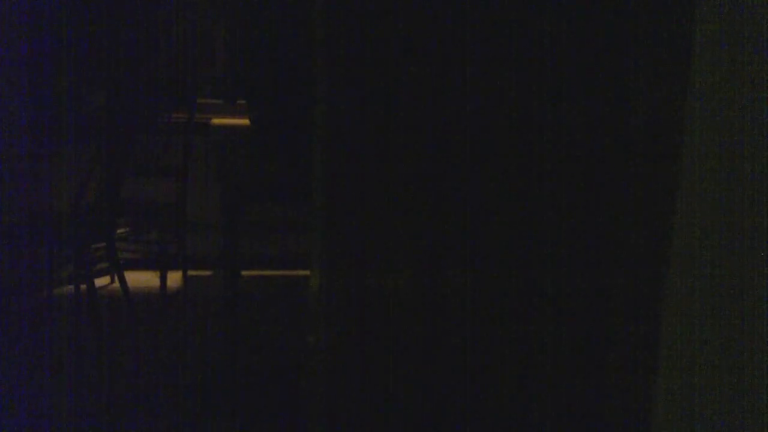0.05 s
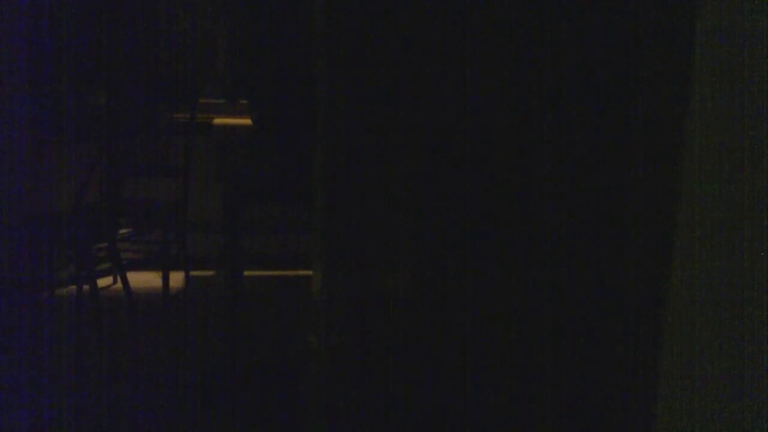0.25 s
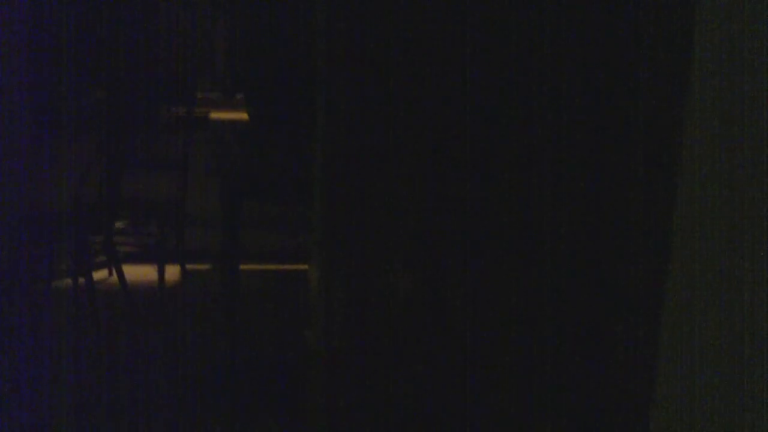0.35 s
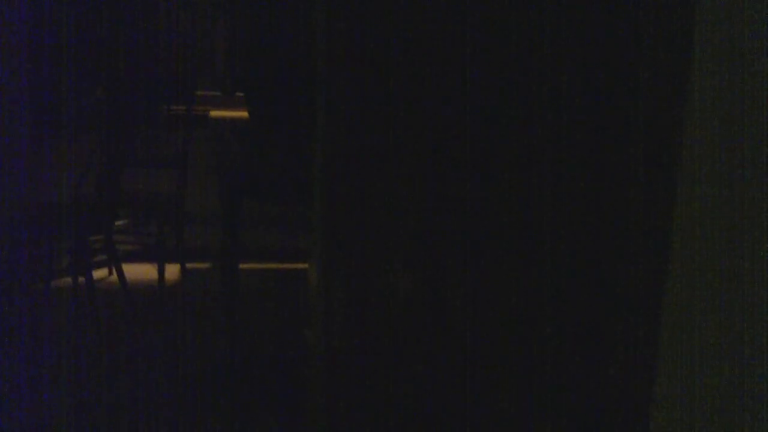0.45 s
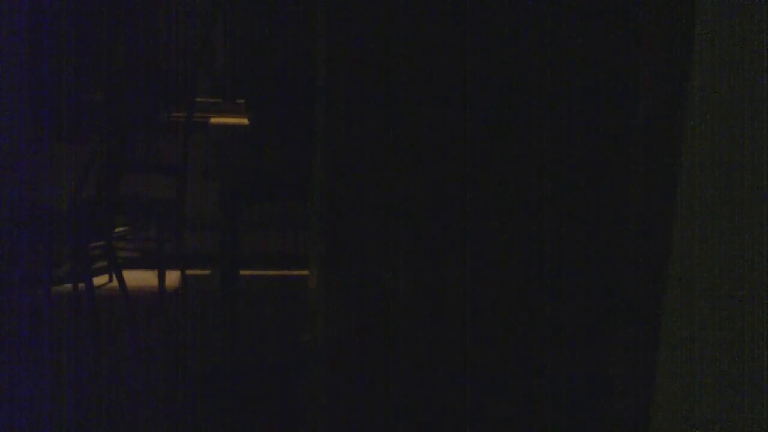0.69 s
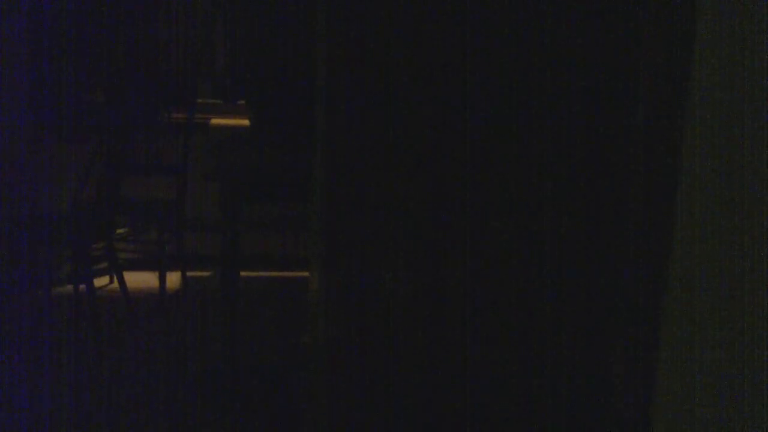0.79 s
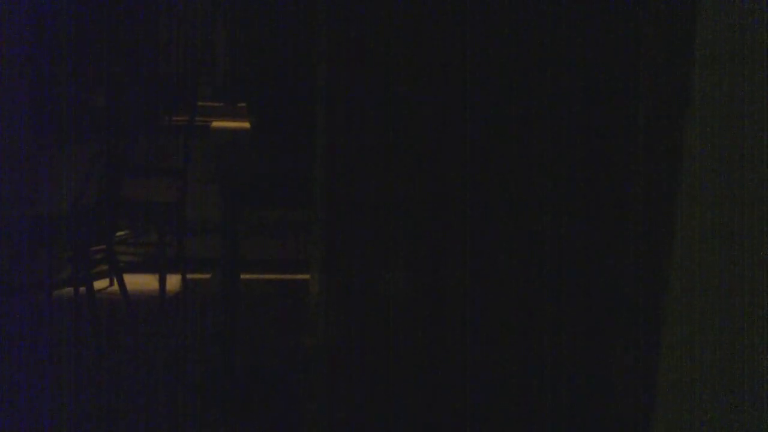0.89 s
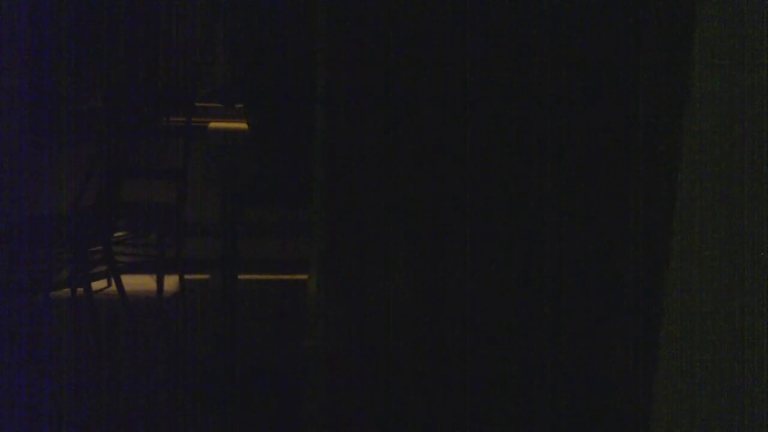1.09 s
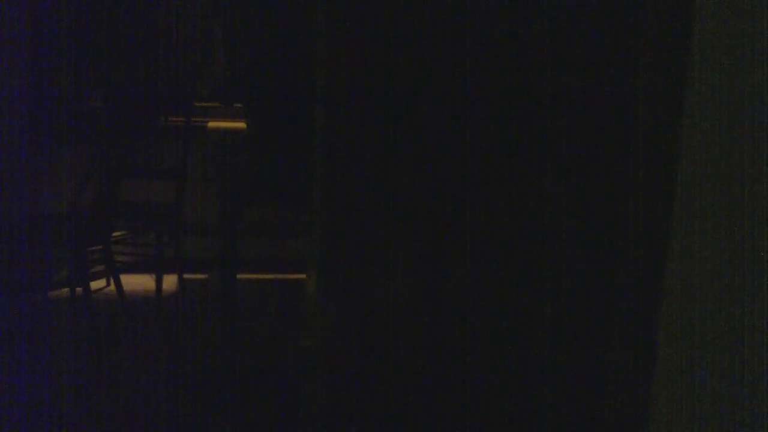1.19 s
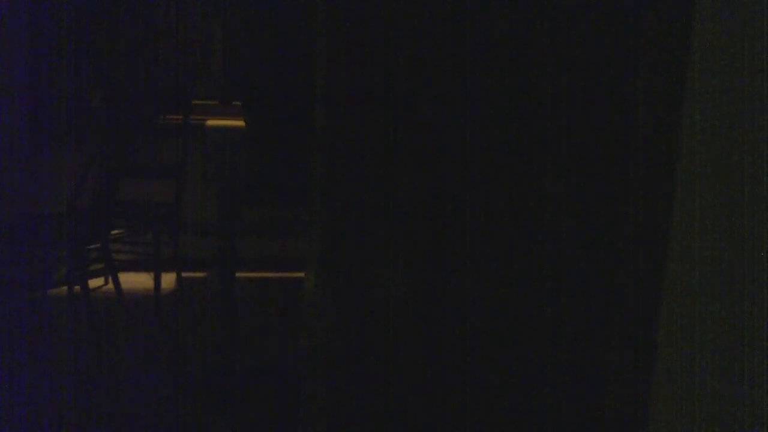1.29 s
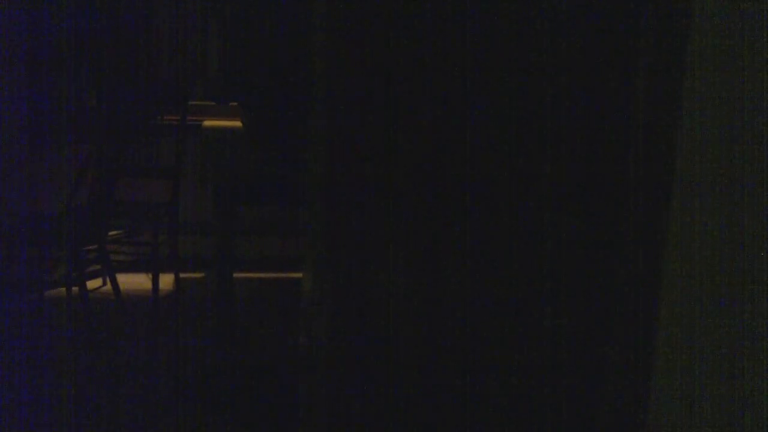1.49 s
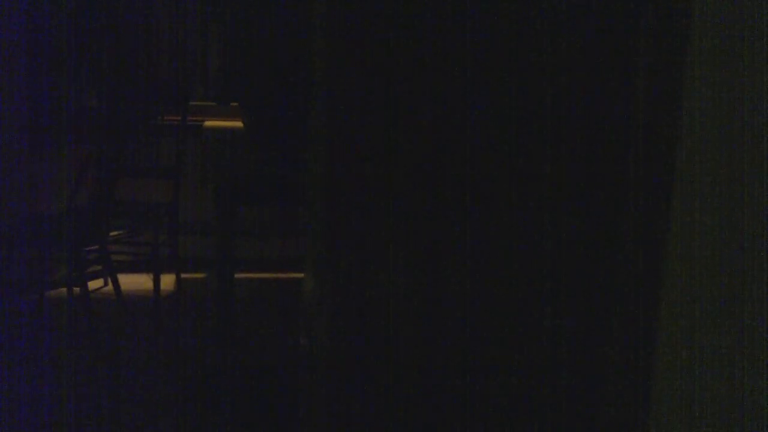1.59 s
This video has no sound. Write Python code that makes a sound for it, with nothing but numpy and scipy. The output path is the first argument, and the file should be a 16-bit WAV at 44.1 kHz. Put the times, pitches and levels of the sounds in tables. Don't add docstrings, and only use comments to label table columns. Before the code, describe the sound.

Three protesting puppy yelps crack from rough bark to shrill whine, ringing in a hard small room

```python
import sys
import numpy as np
from scipy import signal
from scipy.fft import rfft, irfft
from scipy.io import wavfile
from scipy.ndimage import uniform_filter1d

SR = 44100
rng = np.random.default_rng(int(sys.argv[2]) if len(sys.argv) > 2 else 0)


def unload_wav(signal):
    wavfile.write(
        sys.argv[1],
        SR,
        np.round(np.clip(np.atleast_2d(signal).T, -1, 1) * 32767).astype(np.int16),
    )


def boost(x):
    u = np.asarray(x, float) / 20
    return 10 ** u


N = 72765
LEAD_SAMPLES = 11025

# time_s, pitch_hz, level_db, roughness_0_1, half_pitch_share_0_1
EARLIER_YELP = [
    [(-.2, 725, -9, .4, 1), (-.05, 738.5, -38.5, 0.33, 0.23), (.02, 732, -33.5, 0.1, 1)],
    [(-.2, 1810, -16, .2, 0), (-.08, 1816, -36, 0.2674, 0), (-.03, 1890, -59, 0.13, 0.013)],
]


def evened(x):
    return x / np.sqrt(np.mean(x ** 2) + 1e-20)


def read(points, hz):
    table_hz, value = np.transpose(points)
    return np.interp(np.log(hz + 1), np.log(table_hz + 1), value)


def coloured(x, points):
    gain = boost(read(points, np.fft.rfftfreq(len(x), 1 / SR)))
    return irfft(rfft(x) * gain, len(x))


def drift(count, hz):
    width = max(int(SR / hz / 2), 1)
    once = uniform_filter1d(rng.standard_normal(count), width)
    return evened(uniform_filter1d(once, width))


def hiss():
    # freq_hz, density_db
    hiss_spectrum = [(20, -2), (36, -14), (90, -14.5), (200, -14.5), (450, -21), (3000, -23.5), (8000, -40),
                     (15000, -37)]
    return boost(-52.5) * evened(coloured(rng.standard_normal(N), hiss_spectrum))


def channel_noise():
    # freq_hz, density_db
    apart_spectrum = [(15, 4), (60, -6), (150, -12), (500, -22), (1000, -32), (5000, -39), (10000, -37),
                      (15000, -37)]
    noise = boost(-61) * evened(coloured(rng.standard_normal(N), apart_spectrum))
    return noise * np.array([[1], [-1]])


def hum():
    # freq_hz, level_db
    hum_tones = [
        (50.3, -54),
        (120, -70.5),
        (195, -69),
    ]
    t = np.arange(N) / SR
    return sum(boost(db + 1.5 + 0.33 * drift(N, 11)) * np.sin(2 * np.pi * hz * t) for hz, db in hum_tones)


def motor_whine():
    period_s, on_s, first_s = .0667, .03, -.0085
    whine_hz, whine_db, click_db = 12050, -70.5, -60
    t = np.arange(N) / SR
    on = uniform_filter1d(1. * ((t - first_s) % period_s < on_s), size=24)
    tone = boost(whine_db) * on * np.sin(2 * np.pi * whine_hz * t)
    edge = 4 * on * (1 - on)
    return tone + boost(click_db) * edge * np.diff(rng.choice([-1., 1.], N + 1))


def motor_whir():
    # start_s, level_db
    blips = [(.021, -73.5), (0.107, -62), (.625, -61.5), (1.109, -88), (1.51, -86), (1.625, -61)]
    whir_hz, width_hz, whir_db = 7780, 70, -68.5
    blip_s, ramp_s = 0.0105, 0.00067
    t = np.arange(N) / SR
    envelope = boost(whir_db) * drift(N, width_hz)
    for start_s, db in blips:
        to_edge_s = np.minimum(t - start_s, start_s + blip_s - t)
        envelope += boost(db) * np.clip(to_edge_s / ramp_s, 0, 1)
    return np.sqrt(2) * envelope * np.sin(2 * np.pi * whir_hz * t)


def tick():
    tick_modes = [6100, 7100, 9070, 9540, 11100, 14400]
    start_s, length_s, level_db = 0.0095, 0.00079, -30
    t = np.arange(N) / SR
    u = np.clip(t - start_s, 0, 1) / length_s
    return boost(level_db) * u * np.exp(-u) * sum(np.sin(2 * np.pi * hz * t) for hz in tick_modes) / 2


def knocks():
    # start_s, level_db, swing_hz
    hand_knocks = [
        (0.311, -41, 71.4),
        (.335, -44, 45),
        (0.373, -36, 44.4),
        (0.502, -44, 35.3),
    ]
    t = np.arange(N) / SR
    out = np.zeros(N)
    for start_s, db, hz in hand_knocks:
        cycle = np.clip(hz * (t - start_s), 0, 1)
        out -= boost(db) * np.sin(2 * np.pi * cycle) * np.sin(np.pi * cycle)
    return out


def fold_tone(turns, hz, half, shut, throat):
    lowest_db, phase_spread = -5, .35
    blur_db_per_khz, blur_khz = -4, 6.8
    k = np.arange(1, 41)[:, None] / 2
    shape_db = read(throat, k * hz) + shut * np.log2(np.maximum(k, 1))
    shape_db += lowest_db * (k < 1) + blur_db_per_khz * np.maximum(k * hz / 1000 - blur_khz, 0)
    share = np.where(k % 1, half, 1)
    phase = k * turns + phase_spread * rng.random(k.shape)
    partials = np.cos(2 * np.pi * phase) * share * boost(shape_db) * (k * hz < SR / 2.5)
    power = (share ** 2 * boost(2 * shape_db)).sum(0) / 2
    return partials.sum(0) / np.sqrt(power)


def breath_puffs(turns, t, hz, shut, throat):
    puff_cycles, shut_share, edge_ratio = 0.19, .2, 0.94
    count = len(t)
    puffing = np.exp(-(turns % 1) / puff_cycles) * rng.standard_normal(count)
    f, frames, z = signal.stft(coloured(puffing, throat), SR, nperseg=512)
    frame_s = t[0] + frames
    ratio = (f[:, None] + 1) / np.interp(frame_s, t, hz)
    mouth = boost(np.interp(frame_s, t, shut) * shut_share * np.log2(np.maximum(ratio, 1)))
    above_pitch = 1 / (1 + (edge_ratio / ratio) ** 8)
    return evened(signal.istft(z * mouth * above_pitch, SR, nperseg=512)[1][:count])


def voice(curve, throat, shut_db=0, throb_cycles=1, throb_db=0):
    count = 16384
    open_rough, gate_s = .5, .008
    wobble, jitter = .018, .27
    flutter_db, flutter_clear = 4.5, .4
    s, *controls = np.transpose(curve)
    t = s[0] + np.arange(count) / SR
    hz, level_db, rough, half = (np.interp(t, s, c) for c in controls)
    rough, half = np.clip(rough, 0, 1), np.clip(half, 0, 1)
    unsteady = 1 + wobble * drift(count, 70) + jitter * rough ** 2 * drift(count, 500)
    turns = np.cumsum(hz * unsteady) / SR
    shut = shut_db * np.clip(1 - rough / open_rough, 0, 1)

    folds = fold_tone(turns, hz, half, shut, throat)
    puffs = breath_puffs(turns, t, hz, shut, throat)
    mixed = np.sqrt(1 - rough ** 2) * folds + rough * puffs

    flutter = flutter_db * (flutter_clear + rough / 2) * np.tanh(drift(count, 71.2))
    saw = .5 - uniform_filter1d(turns / throb_cycles % 1, size=30)
    throb = throb_db * np.clip(2 * rough, 0, 1) * saw
    gate = np.clip(np.minimum(t - s[0], s[-1] - t) / gate_s, 0, 1)
    out, at = np.zeros(N + LEAD_SAMPLES + count), LEAD_SAMPLES + round(s[0] * SR)
    out[at:at + count] = mixed * boost(level_db + flutter + throb) * gate
    return out[:N + LEAD_SAMPLES]


def moan():
    # time_s, pitch_hz, level_db, roughness_0_1, half_pitch_share_0_1
    moans = [
        [(.49, 577, -60, 0.05, 1), (.525, 409.5, -33, 0.65, 1), (.56, 400, -92, 0.2, 0.3)],
        [(.945, 484.2, -42, 0.3, 0.3), (.965, 451.8, -24, 0.36, 1), (1.01, 585.7, -32.5, 0.84, 0.5),
         (1.04, 427, -32, 0.3, 0.3)],
        [(1.44, 688.6, -30, 0, 0), (1.475, 480, -24, 0.5, 1), (1.495, 515, -46, .3, 0.5),
         (1.52, 572, -29.5, 0, 0.1), (1.54, 497.4, -52, 0.5, 0.53), (1.565, 544, -32, 0.52, 0.1),
         (1.6, 410, -49, 0.04, 0.5)],
    ]
    # freq_hz, gain_db
    moan_throat = [(250, -1.5), (360, 11.5), (480, 15), (1100, -4), (2000, -37), (5000, -37), (15000, -79)]
    return sum(voice(curve, moan_throat) for curve in moans)


def falsetto():
    # time_s, pitch_hz, level_db, roughness_0_1, half_pitch_share_0_1
    arches = [
        [(.31, 1561, -12, 0.04, 0.34), (.34, 1621, -17.5, 0.24, 0.05), (.385, 1638, -16, 0.03, 0),
         (.41, 1603, -22.5, 0.2, 0.32), (.45, 1400, -30, 0.46, 0.22), (.50, 1123, -25, 0.22, 0.16),
         (.52, 1100, -58, 0.3, 0)],
        [(.80, 1541, -19.5, 0.3, 0.44), (.84, 1620, -14, 0.15, 0), (.88, 1489, -18.5, 0.04, 0),
         (.92, 1309, -28.5, 0, 0.42), (.955, 1106, -20, 0, 0.13), (.97, 1056, -45, 0.3, 0.2)],
        [(1.255, 1240, -38.5, 0.05, 0.2), (1.28, 1411, -21, 0, 0), (1.315, 1699, -24.5, .15, 0.08),
         (1.345, 1752, -21, 0.19, 0.03), (1.375, 1757, -19, 0.15, 0), (1.40, 1631, -17.5, 0.18, 0.08),
         (1.42, 1214, -34, 0.33, 0.24), (1.45, 1137, -25.5, 0.04, 0.02), (1.47, 1123, -19, 0, 0)],
    ]
    # freq_hz, gain_db
    falsetto_throat = [(1100, 19), (1700, 2), (2700, -0.5), (3200, -12.5), (3550, 0), (4300, -19),
                       (5200, -18.5), (15000, -39)]
    return sum(voice(curve, falsetto_throat) for curve in arches + EARLIER_YELP[1:])


def chest_voice():
    # time_s, pitch_hz, level_db, roughness_0_1, half_pitch_share_0_1
    climbs = [
        [(.145, 296.2, -41, 0.5, 1), (.19, 431, -23, 0.4, 0.2), (.222, 464.8, -20.5, 0.54, 0.43),
         (.25, 497.9, -17.5, 0.55, 0.35), (.275, 652.6, -15.5, 0.56, 0.97), (.30, 653.6, -14, 0.47, 0.86),
         (.335, 679.1, -15.5, 0.65, 1), (.355, 620, -73, 0, 0.7)],
        [(.676, 541.3, -30, 0, 0.23), (.697, 620, -29, 0.26, 0.12), (.71, 708.3, -17.5, 0.03, 0),
         (.721, 786, -9, 0.07, 0.06), (.74, 798.5, -16.5, 0.34, 0.38), (.76, 848.9, -19.5, 0.59, 0),
         (.79, 898.2, -17, .6, 0.26), (.815, 919.7, -12, .55, 0.43), (.85, 953, -78, 0, 0.3)],
        [(1.168, 492.6, -32.5, 0.2, 0.4), (1.185, 576.2, -31.5, 0.1, 0.25), (1.203, 701, -18, 0.25, 0.6),
         (1.212, 713.2, -58, 0.12, 0.38), (1.22, 742.2, -12, 0.2, 0.84), (1.245, 718.3, -26.5, 0.37, 0.25),
         (1.29, 726, -21.5, 0.45, 0.7), (1.33, 787, -38, 0.57, 0), (1.43, 800, -35, 0, 0.8)],
    ]
    # fold_cycles_per_throb, depth_db
    throbs = [
        (6.5, 11),
        (11.5, 14),
        (5.9, 20),
    ]
    # freq_hz, gain_db
    chest_throat = [(380, -5.5), (600, -0.5), (800, 5.5), (1050, 3), (2300, -4.5), (3700, -12), (5000, -25),
                    (15000, -41)]
    shut_db = -17
    out = voice(EARLIER_YELP[0], chest_throat, shut_db)
    for curve, (cycles, depth_db) in zip(climbs, throbs):
        out += voice(curve, chest_throat, shut_db, cycles, depth_db)
    return out


def puppy():
    # freq_hz, gain_db
    kennel = [(200, -38), (270, -14), (330, 0), (8000, -0.5), (15000, 2.5)]
    return coloured(chest_voice() + falsetto() + moan(), kennel)


def room(x):
    # freq_hz, t60_s
    tail_t60 = [(250, 0.053), (480, 0.29), (750, 0.46), (1700, 0.45), (4500, 0.43), (12000, 0.65)]
    # freq_hz, level_db, t60_s
    standing_waves = [(3730, -12, 1), (578, -8, 0.19), (676.8, -7, 0.2), (732, -9, 0.24),
                      (809, -24.5, 0.22), (6530, 0.5, 0.15), (879, -6, 0.82), (983, -8, 0.39),
                      (1122, -17, 0.85), (1316, 0, 0.51), (3525, -8, 0.96), (1635, -8.5, 0.79),
                      (1690, -39, .5), (2305, 1, .5)]
    direct_db, room_db, gap_s = -4, 1, 0.0047
    taps, at = np.zeros(SR), np.arange(0, SR - 20, 20)
    taps[at + rng.integers(0, 20, len(at))] = rng.choice([-1., 1.], len(at))
    hz, frame_s, z = signal.stft(taps, SR, nperseg=256)
    decay = boost(-60 * frame_s / read(tail_t60, hz)[:, None])
    tail = signal.istft(z * decay, SR, nperseg=256)[1][:SR]
    tail /= np.linalg.norm(tail)
    t = np.arange(SR) / SR
    for f, db, t60_s in standing_waves:
        fall = boost(-60 * t / t60_s)
        tail += boost(db) * 8 * fall / fall.sum() * np.sin(2 * np.pi * f * t)
    tail *= np.clip(t / gap_s - .5, 0, 1)
    ring = signal.fftconvolve(x, tail)[:len(x)]
    return (boost(direct_db) * x + boost(room_db) * ring)[LEAD_SAMPLES:]


def scene():
    offset = [
        [.001],
        [.0004],
    ]
    camera = hiss() + hum() + motor_whine() + motor_whir() + tick()
    return camera + knocks() + room(puppy()) + channel_noise() + offset


def top_cut(x):
    return signal.sosfilt(signal.butter(12, 15160, fs=SR, output="sos"), x)


def record(dry):
    ceiling, skew, edge_hz = .96, 0.0092, 14950
    soft = dry / (1 + (dry / ceiling) ** 6) ** (1 / 6)
    swung = soft + skew * soft ** 2
    lowpass = signal.firwin(511, edge_hz, window=("kaiser", 9), fs=SR)
    mix = signal.oaconvolve(swung, lowpass[None], "same")
    return top_cut(mix)


dry = scene()
out = record(dry)
unload_wav(out)
```